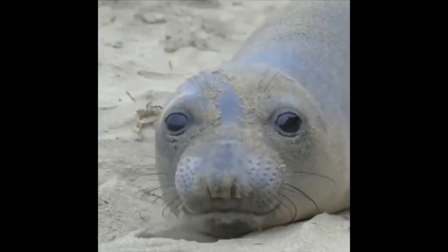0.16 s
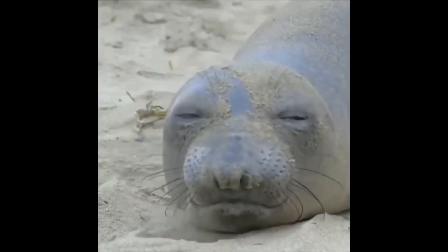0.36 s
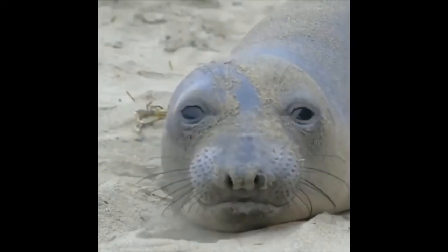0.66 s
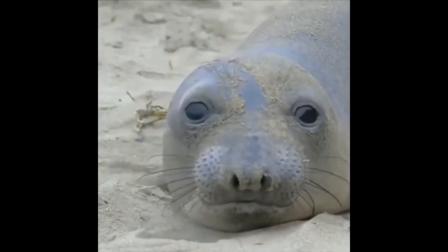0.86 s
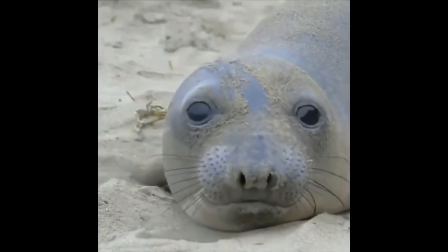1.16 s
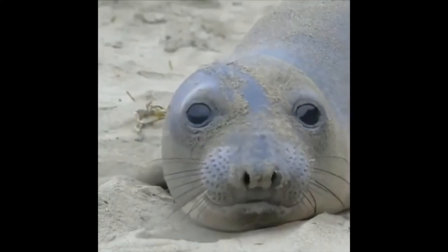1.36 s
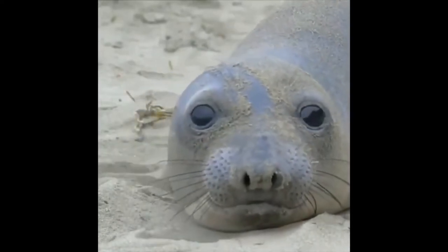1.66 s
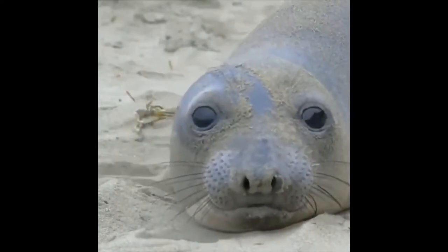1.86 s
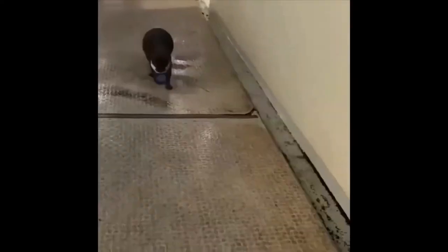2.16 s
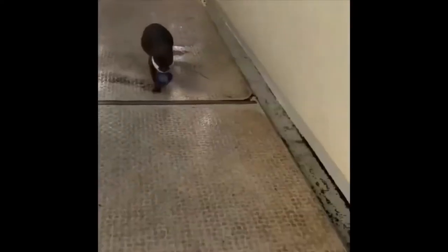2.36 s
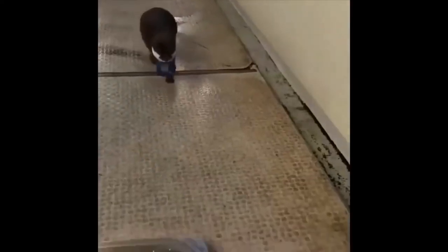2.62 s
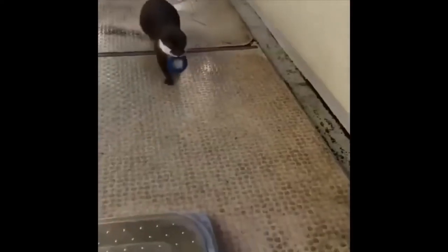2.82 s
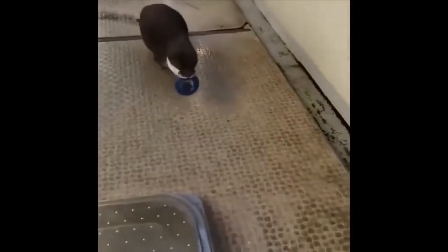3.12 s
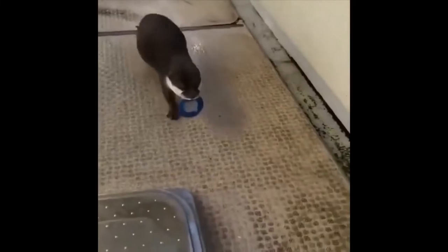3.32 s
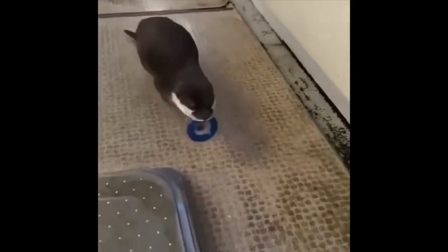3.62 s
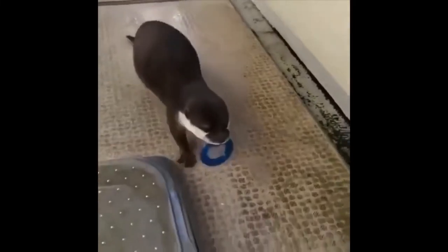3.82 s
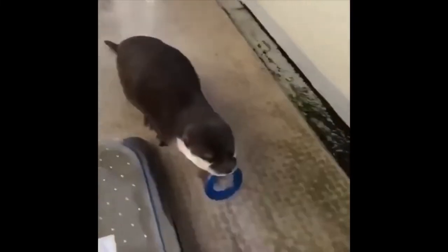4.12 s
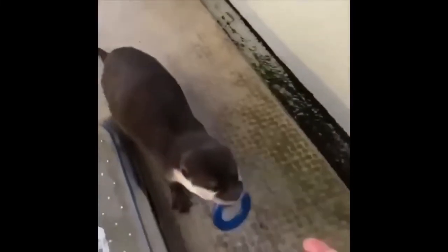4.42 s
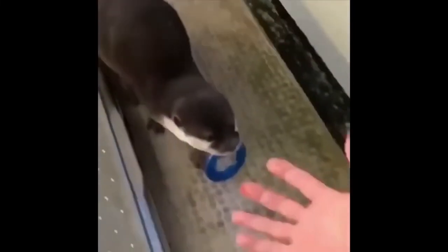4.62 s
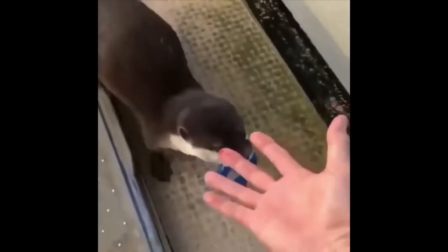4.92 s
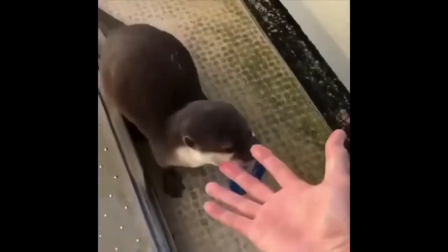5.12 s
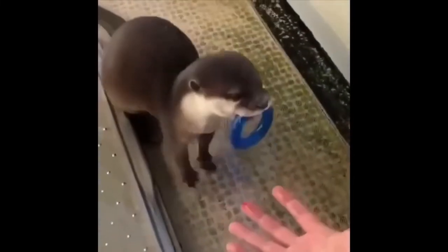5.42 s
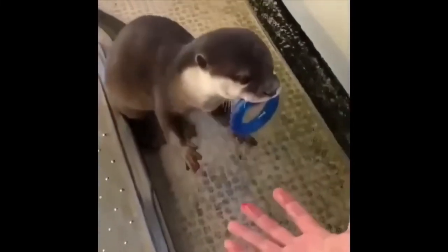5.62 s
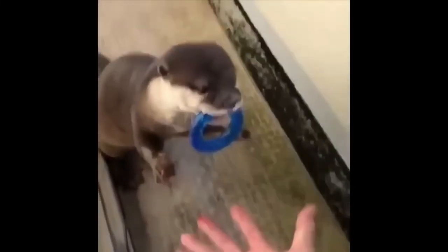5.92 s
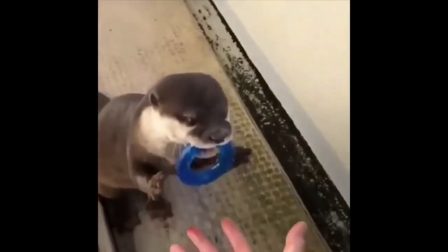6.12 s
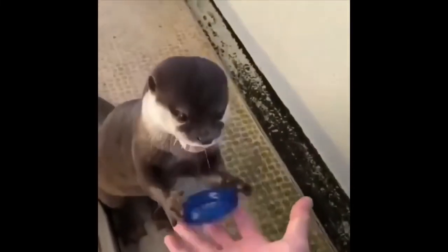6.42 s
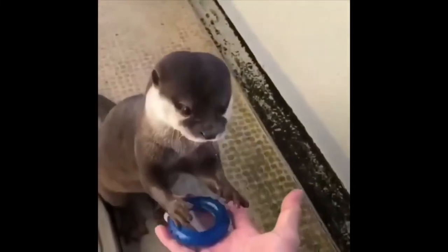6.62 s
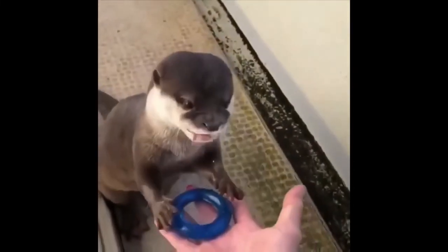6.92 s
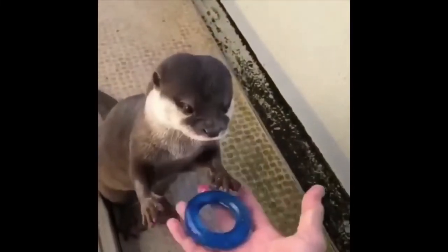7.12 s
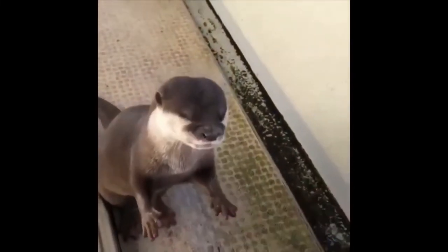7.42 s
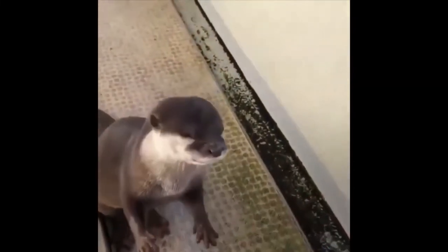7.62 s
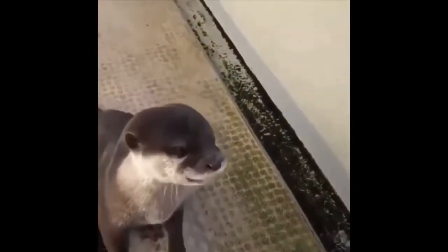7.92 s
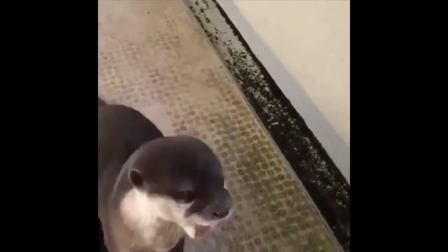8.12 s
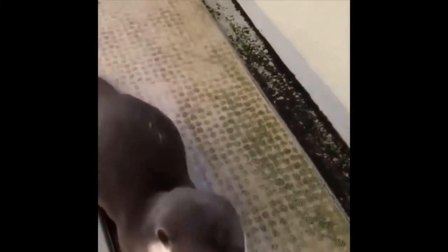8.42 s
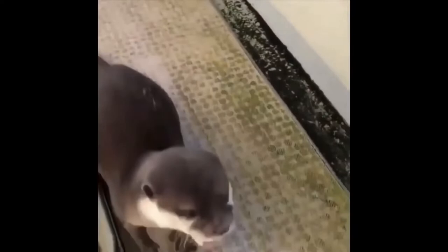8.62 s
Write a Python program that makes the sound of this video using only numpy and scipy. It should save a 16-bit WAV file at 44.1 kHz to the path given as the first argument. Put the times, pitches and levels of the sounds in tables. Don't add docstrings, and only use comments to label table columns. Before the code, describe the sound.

From 0 to 2.15 s, soft surf hisses and washes on a beach. A seal pup gives small nasal puffs and low snort thumps around 0.4-0.8 s and one at 1.57 s; distant seals grunt faintly from 0.6 to 2 s. A quick dropout leads to silence until 2.35 s, when a hard-walled pen cuts in with low microphone buffeting and an otter's falling whistle. Chirps at 2.86 and 2.99 s lead into another sinking whistle to 3.5 s; chirps at 3.85 and 3.97 s run into a longer one until 4.85 s. Claws and a rubber ring tick on the floor. A catch and chirp near 5.4 s start the longest squeal, to 6.1 s. From 6.5 to 7.5 s a wavering whistle leaps, then sinks hoarsely in steps. Afterwards only shuffles, ticks, faint hum and room hiss remain to 9 s.

```python
import sys
import numpy as np
from scipy import signal
from scipy.fft import rfft, irfft
from scipy.io import wavfile
from scipy.ndimage import uniform_filter1d, minimum_filter1d

SR = 44100
rng = np.random.default_rng(int(sys.argv[2]) if len(sys.argv) > 2 else 0)


def store_wav(level_fs):
    pcm = np.round(np.clip(np.atleast_2d(level_fs), -1, 1) * 32767)
    wavfile.write(sys.argv[1], SR, pcm.T.astype(np.int16))


def volts(x):
    e = np.asarray(x, float) / 20
    return 10 ** e


N = 386316


def in_time(rows):
    s, *columns = np.transpose(rows)
    return [np.interp(np.arange(N) / SR, s, c) for c in columns]


def at_hz(points, hz):
    table_hz, db = np.array(points).T
    return np.interp(np.log(hz), np.log(table_hz), db)


def joined(tables):
    return sorted(row for rows in tables for row in rows)


def rms_one(x):
    return x / np.sqrt(np.mean(x ** 2) + 1e-20)


def white_noise():
    return rng.standard_normal(N)


def drift(rate):
    r = np.exp(-80 * np.pi * rate / SR)
    slow = signal.lfilter([1], [1, -2 * r, r * r], rng.standard_normal(N // 40 + 2002))[2000:]
    return np.interp(np.arange(N) / 40, np.arange(len(slow)), rms_one(slow))


def plateau(s, rise_s, hold_s, fall_s):
    return np.interp(np.arange(N) / SR, np.cumsum([s, rise_s, hold_s, fall_s]), [0, 1, 1, 0])


def hump(ratio, width_oct):
    return np.exp(-.5 * (np.log2(ratio) / width_oct) ** 2)


def band(x, low_hz, high_hz, order=2):
    return signal.sosfilt(signal.butter(order, [low_hz, high_hz], "band", fs=SR, output="sos"), x)


def coloured(spectrum, patchy_db):
    hz = np.maximum(np.fft.rfftfreq(N, 1 / SR), 1)
    shaped = rfft(white_noise()) * volts(at_hz(spectrum, hz))
    power = np.abs(shaped) ** 2
    together = drift(7.2)
    out = np.zeros(N)
    for centre in 30 * 2. ** np.arange(10):
        share = np.cos(np.pi / 2 * np.clip(np.log2(hz / centre), -1, 1)) ** 2
        if share @ power > 1e-5 * np.sum(power):
            flicker_db = patchy_db * (0.12 * together + drift(10.7))
            out += irfft(shaped * share, N) * volts(flicker_db)
    return rms_one(out)


def sounding(tables, fade_s):
    gate, t = np.zeros(N), np.arange(N) / SR
    for rows in tables:
        opening = np.clip((t - rows[0][0]) / fade_s + .5, 0, 1)
        closing = np.clip((rows[-1][0] - t) / (4 * fade_s) + .5, 0, 1)
        gate += opening * closing
    return in_time(joined(tables)), np.minimum(gate, 1)


def knocks(events, cycles, rise):
    out = np.zeros(N)
    for (s, peak_db, hz, *_), sign in zip(events, rng.choice([-1, 1], len(events))):
        turns = np.arange(int(3 * cycles / hz * SR)) / SR * hz
        shape = (turns / cycles) ** rise * np.exp(-3 * turns / cycles)
        swing = np.sin(2 * np.pi * turns) * shape
        at = round(s * SR)
        out[at:at + len(turns)] += (sign * volts(peak_db) * swing / np.abs(swing).max())[:N - at]
    return out


# (time [s], hiss level [dB], low wash level over the hiss [dB])
SURF = [
    (0.0, -35.5, -2.5),
    (0.36, -37, -4.5),
    (.66, -36, -9),
    (1.0, -39, -2.5),
    (1.5, -37, -9.5),
    (1.9, -37.5, 0.5),
    (2.05, -37, -4),
    (2.15, -37.5, -3.5),
]
# (frequency [Hz], level per Hz [dB])
SURF_TONE = [(18, -69), (30, -11.5), (148, 2), (255, 1.5), (708, -5.5), (1220, -4), (1960, -5),
             (3300, -9.5), (4930, -19), (8320, -31.5), (11500, -37), (15000, -88)]


def surf():
    hiss_db, wash_db = in_time(SURF)
    hiss = coloured(SURF_TONE, patchy_db=1.0)
    low = signal.sosfilt(signal.butter(1, 350, fs=SR, output="sos"), hiss)
    return volts(hiss_db - 1.63) * (hiss + (volts(wash_db + 2.0) - 1) * low)


# (time [s], length [s], start pitch [Hz], end pitch [Hz], level [dB])
GRUNTS = [
    (0.618, 0.068, 233, 265, -55),
    (0.959, 0.13, 255, 294, -43.5),
    (1.147, 0.24, 182.4, 168.5, -43.5),
    (1.594, 0.1086, 142.2, 140.5, -41.5),
    (1.802, .22, 176, 202.8, -45.5),
]


def far_grunts():
    shapes = []
    for s, length, hz, end_hz, db in GRUNTS:
        shapes.append([(s, hz, db - 7), (s + 0.022, hz, db), (s + length, end_hz, db - 6)])
    (hz, grunt_db), gate = sounding(shapes, fade_s=.02)
    tone = np.sin(2 * np.pi * np.cumsum(hz) / SR)
    return np.sqrt(2) * gate * volts(grunt_db + 1.1 * drift(20)) * tone


# (time [s], hold [s], level [dB])
PUFFS = [
    (0.406, 0.14, -55),
    (0.577, 0.11, -51.5),
]
# (time [s], peak level [dB], pitch [Hz])
SNORTS = [
    (0.41, -39, 247),
    (0.63, -24, 180),
    (0.667, -19, 217),
    (0.687, -19, 222),
    (0.786, -28, 190),
    (1.566, -19.5, 316),
]


def seal_pup():
    blowing = sum(volts(db) * plateau(s, 0.02, hold, 0.02) for s, hold, db in PUFFS)
    puff = blowing * rms_one(band(white_noise(), 4200, 7300))
    return puff + volts(-9.0) * knocks(SNORTS, cycles=2.6, rise=0.19)


def beach():
    mix = surf() + far_grunts() + seal_pup()
    return signal.sosfilt(signal.cheby2(12, 50, 11900, fs=SR, output="sos"), mix)


def pump():
    hz = 118 * (1 + 0.0243 * drift(8.24))
    return volts(-53 + 2.2 * drift(1.0)) * np.sin(2 * np.pi * np.cumsum(hz) / SR)


# (frequency [Hz], level per Hz [dB])
RUMBLE = [(15, -55), (25, -13), (54, -3.5), (113, -3), (190, -10.5), (281, -14), (330, -23), (430, -20.5),
          (730, -120)]


def rumble():
    usual_db, buffet_db = -48.5, -38.5
    buffet = plateau(2.03, 0.34, 0.27, 0.17)
    return volts(usual_db + (buffet_db - usual_db) * buffet) * coloured(RUMBLE, patchy_db=3.0)


# (time [s], peak level [dB], pitch [Hz])
GUSTS = [(2.352, -20.5, 132), (2.362, -16.5, 270), (2.387, -20.5, 200), (2.423, -22, 222),
         (2.4502, -13, 340), (2.4546, -18.5, 200), (2.470, -19.5, 134), (2.519, -25.5, 156),
         (2.556, -21.5, 125), (2.594, -17, 280), (2.607, -23.5, 95), (2.655, -26.5, 95),
         (2.714, -30.5, 169), (2.755, -35, 160), (2.797, -25, 155), (6.305, -34.5, 144), (7.637, -36, 238),
         (7.681, -35, 119)]


def gusts():
    rebounds = [(s + 0.01025, db - 7, max(0.48 * hz, 70)) for s, db, hz in GUSTS]
    swings = volts(2.0) * band(knocks(list(GUSTS) + rebounds, cycles=1.74, rise=0.52), 24, 740)
    swirl = uniform_filter1d(np.abs(swings), int(0.0065 * SR)) * rms_one(band(white_noise(), 84, 596))
    return swings + volts(-11.5) * swirl


def patter(stir_db):
    per_s = 20 * volts(2 * stir_db)
    born = rng.random(N) < per_s / SR
    clicks = born * volts(-50 + 4.1 * np.minimum(rng.exponential(1, N), 3)) + 1e-18
    dealt = rng.integers(0, 5, N)
    out = np.zeros(N)
    for k, hz in enumerate(np.geomspace(2400, 7500, 5)):
        out += 4 * band(clicks * (dealt == k), hz, 1.77 * hz, order=1)
    return out


# (middle time [s], length [s], level over the usual rustle [dB])
SHUFFLES = [
    (2.804, 0.081, 14),
    (3.72, 0.28, 11.5),
    (5.14, 0.25, 9),
    (6.287, 0.25, 10),
    (7.552, 0.58, 7.5),
    (8.216, 0.3, 9.5),
    (8.36, 0.081, 6),
    (8.415, 0.47, 8.5),
]
# (frequency [Hz], level per Hz [dB])
RUSTLE = [(1940, -1), (3300, -4), (4550, -3.5), (5450, -5), (5690, -7), (7110, -9.5), (13000, -14),
          (14000, -18)]


def floor_rustle():
    stir_db = sum(db * plateau(s - length / 2, length / 2, 0, length / 2) for s, length, db in SHUFFLES)
    return volts(-60 + stir_db) * coloured(RUSTLE, patchy_db=4.5) + patter(stir_db)


# (frequency [Hz], level per Hz [dB])
AIR = [(160, -23), (280, 0), (506, -5.5), (625, -6), (924, -7), (1220, -9), (1720, -12), (1880, -5.5),
       (3500, -21), (4550, -34), (7700, -120)]


def pen_air(calling):
    air = volts(-53) * coloured(AIR, patchy_db=2.5)
    duck = volts(-1.5 * uniform_filter1d(calling, int(0.028 * SR)))
    return pump() + rumble() + duck * (air + floor_rustle()) + gusts()


# (time [s], peak level [dB], pitch [Hz])
FAR_SQUEAK = [
    (3.125, -40, 870),
    (3.645, -41, 1850),
    (5.2, -46, 2168),
    (5.25, -53, 2110),
    (5.275, -51, 3100),
]


def far_squeaks():
    return knocks(FAR_SQUEAK, cycles=17.0, rise=2.5)


# (time [s], peak level [dB], main ring [Hz], bright part over peak [dB])
TICKS = [(2.362, -31, 2210, -18.5), (2.451, -34, 1000, -29), (2.785, -24.5, 2310, -35),
         (2.7953, -22.5, 2144, -30.5), (2.8809, -23, 2060, -36), (3.0002, -21.5, 2340, -29.5),
         (3.169, -34.5, 2148, -13), (3.492, -48, 2280, -7), (3.611, -66, 3570, 1), (3.706, -24, 2310, -26),
         (3.724, -35.5, 1855, -23), (3.767, -53.5, 2355, -5), (3.791, -59, 2426, -4),
         (3.926, -43, 2723, -18), (4.519, -27, 1946, -19), (4.6339, -28.5, 932, -14.5),
         (4.737, -22.5, 1727, -17.5), (4.86, -40.5, 4704, -20), (4.8868, -37, 2534, -23),
         (5.0462, -26, 3036, -18), (5.049, -25, 8300, -36), (5.049, -32, 9200, -27),
         (5.0983, -33, 2245, -19), (5.262, -57, 3060, -6), (5.321, -54, 4810, -31),
         (5.6535, -47, 3010, -23), (6.093, -55, 2210, -3), (6.2655, -37.5, 2730, -16),
         (6.2665, -37, 4495, -20), (7.359, -39.5, 1603, -8.5)]
# (time [s], peak level [dB], main ring [Hz], bright part over peak [dB])
LATE_TICKS = [ (7.4953, -31, 2053, -17.5), (7.548, -56, 4550, -12), (7.5777, -38, 5560, -24),
              (7.6095, -63, 3520, 2), (7.657, -48, 4730, -20), (7.67, -42, 4770, -29),
              (7.687, -37.5, 6350, -24), (7.7, -38.5, 4350, -23), (7.7538, -43, 1940, -13.5),
              (7.806, -39.5, 3110, -24), (7.915, -58, 1860, 2), (7.948, -66, 2140, -1),
              (8.0634, -62, 2370, 2.5), (8.2242, -23, 2054, -16.5), (8.226, -40, 5170, -40),
              (8.2257, -29, 1580, -35), (8.227, -49, 6070, -27), (8.34, -37, 2930, -32),
              (8.352, -44, 4440, -28), (8.4743, -41, 2490, -16), (8.52, -45, 3350, -23),
              (8.6, -52, 6300, -25), (8.6288, -44.5, 2300, -29), (8.7, -51, 5100, -30),
              (8.7544, -43, 3130, -8.5)]


def ticks():
    contacts = list(TICKS) + list(LATE_TICKS)
    bodies = [(s, db - 8, 0.58 * hz) for s, db, hz, _ in contacts]
    out = volts(-1.5) * knocks(contacts, cycles=9.0, rise=1.1) + knocks(bodies, cycles=2.9, rise=0.63)
    t = np.arange(SR // 20) / SR
    for s, peak_db, hz, bright_db in contacts:
        white = rng.standard_normal(len(t))
        mode_hz = min(2.65 * hz, 9500)
        crack = .7 * band(white, 1000, 14500, order=1) + 2.5 * band(white, .82 * mode_hz, 1.2 * mode_hz)
        crack *= np.exp(-t / 0.0055) * np.clip(t / 0.0011, 0, 1)
        at = round(s * SR)
        out[at:at + len(t)] += (volts(peak_db + bright_db + 16.0) * crack / np.abs(crack).max())[:N - at]
    return out


# (time [s], hold [s], level [dB])
RASPS = [
    (2.803, 0.11, -54.5),
    (2.885, 0.065, -49),
    (2.944, 0.15, -48.5),
    (3.867, 0.11, -46.5),
    (3.996, 0.1, -45),
    (5.378, 0.025, -54),
]


def rasps():
    blowing = sum(volts(db) * plateau(s, 0.0061, hold, 0.0061) for s, hold, db in RASPS)
    return blowing * volts(5.1 * drift(54)) * rms_one(band(white_noise(), 990, 2650))


# (top time [s], climb [s], top pitch [Hz], landing pitch [Hz], push [dB])
CHIRPS = [
    (2.864, 0.029, 2250, 874, -34.5),
    (2.987, 0.043, 2100, 1250, -33),
    (3.849, 0.035, 2280, 933, -25.5),
    (3.971, 0.032, 1645, 1237, -39.5),
    (5.44, 0.03, 1972, 1230, -28),
]
# (start pitch [Hz], drop [s])
CHIRP_GLIDES = [
    (1778, .044),
    (1197, .04),
    (1448, .038),
    (1185, .031),
    (1217, 0.036),
]
CHIRP_END_DB = [
    -22,
    -3,
    -33,
    -1.5,
    -19,
]
CHIRP_OPENING_DB = [
    -8,
    -9.5,
    -19,
    -3.5,
    -12,
]


def chirps():
    pitch, effort = [], []
    start_db = -21.5
    for chirp, glide, end_db, open_db in zip(CHIRPS, CHIRP_GLIDES, CHIRP_END_DB, CHIRP_OPENING_DB):
        s, climb, top_hz, landing_hz, db = chirp
        start_hz, drop = glide
        fall_hz = top_hz - landing_hz
        end = s + drop + 0.011
        pitch.append([
            (s - climb, start_hz),
            (s - climb / 2, top_hz - .2 * (top_hz - start_hz)),
            (s, top_hz),
            (s + drop / 3, top_hz - .11 * fall_hz),
            (s + 2 * drop / 3, top_hz - .72 * fall_hz),
            (s + drop, landing_hz),
            (end, landing_hz)])
        effort += [
            (s - climb, db + start_db, open_db - start_db / 2),
            (s - climb / 3, db, open_db),
            (s + drop / 4, db, open_db),
            (end, db + end_db, open_db - end_db / 2)]
    return pitch, effort


# (time [s], pitch [Hz])
WHISTLES = [
    [(2.347, 1150), (2.393, 1145), (2.441, 1104), (2.459, 995), (2.521, 973.8), (2.529, 912), (2.561, 942),
     (2.593, 872.6), (2.608, 835)],
    [(3.04, 1216), (3.06, 1234), (3.21, 1192), (3.288, 1109), (3.348, 1138), (3.396, 997), (3.452, 995),
     (3.478, 856), (3.495, 822)],
    [(4.02, 1196), (4.048, 1262), (4.106, 1192), (4.13, 1232), (4.142, 1228), (4.244, 1119), (4.348, 1090),
     (4.406, 1037), (4.5, 984)],
    [(4.501, 947), (4.521, 965), (4.585, 949), (4.615, 986), (4.653, 924.5), (4.729, 933.5), (4.807, 786.5),
     (4.837, 752), (4.85, 800)],
]
# (time [s], pitch [Hz])
WHISTLES_NEAR = [
    [(5.487, 1234), (5.507, 1474), (5.519, 1572), (5.54, 1370), (5.59, 1272), (5.64, 1254), (5.662, 1276),
     (5.676, 1233), (5.716, 1276)],
    [(5.717, 1243), (5.748, 1290), (5.78, 1250), (5.82, 1248), (5.9, 1201), (6.0, 1197), (6.047, 1149),
     (6.071, 907), (6.083, 902)],
    [(6.515, 963), (6.551, 1166), (6.561, 1238), (6.577, 1006), (6.625, 1033), (6.667, 896), (6.743, 957),
     (6.771, 918), (6.8, 956)],
]
# (time [s], pitch [Hz])
LAST_RISE = [
    [(6.801, 964), (6.813, 1006), (6.827, 1184), (6.835, 1199), (6.845, 1184), (6.895, 1240), (6.917, 1306),
     (6.95, 1291)],
    [(6.951, 1247), (6.979, 1214), (7.039, 1189), (7.057, 1148), (7.091, 1170), (7.105, 1128),
     (7.115, 1085)],
]
# (time [s], pitch [Hz])
LAST_FALL = [
    [(7.116, 1025), (7.128, 1011), (7.184, 985), (7.22, 913), (7.236, 867), (7.28, 873), (7.3, 853)],
    [(7.301, 830), (7.341, 861), (7.401, 774.5), (7.437, 699), (7.469, 667), (7.49, 663)],
]
# (time [s], pitch [Hz], push [dB], mouth opening [dB])
CATCH = [
    (5.384, 789, -39, -9),
    (5.394, 826.5, -38, -10),
    (5.404, 990, -20.5, -16),
    (5.41, 1124, -34, -3.5),
]


def pitch_path(chirp_pitch):
    calls = list(WHISTLES) + list(WHISTLES_NEAR) + list(LAST_RISE) + list(LAST_FALL)
    catch = [(s, hz) for s, hz, *_ in CATCH]
    (hz,), gate = sounding(calls + chirp_pitch + [catch], fade_s=0.0046)
    return uniform_filter1d(hz, int(.006 * SR)), gate


CHIRP_STRAIN = [
    .35,
    .25,
    .12,
    .4,
    .05,
]
# (time [s], hold [s], strain [0-1])
HOARSE = [
    (2.98, .04, .6),
    (3.97, .11, .9),
    (2.56, .03, .4),
    (3.42, .07, .6),
    (4.81, .03, .4),
    (6.5, .05, .6),
    (7.37, .1, .45),
]


def fold_strain(hz, chirp_pitch):
    glide = np.abs(np.gradient(np.log(hz))) * SR
    strain = np.clip(uniform_filter1d(glide, int(.03 * SR)) / 20, 0, 1)
    for rows, least in zip(chirp_pitch, CHIRP_STRAIN):
        start, end = rows[0][0], rows[-1][0]
        strain = np.maximum(strain, least * plateau(start, 0.0026, end - start, 0.0066))
    hoarse = sum(share * plateau(s, 0.025, hold, 0.03) for s, hold, share in HOARSE)
    return np.clip(np.maximum(strain, hoarse), 0, 1)


# (time [s], push [dB], mouth opening over push [dB])
EFFORT = [
    [(2.347, -35.5, -11), (2.361, -41, -5), (2.455, -39, -8.5), (2.491, -57, 12), (2.511, -36.5, -10.5),
     (2.579, -40, -9.5), (2.608, -74, 3)],
    [(3.04, -44, 0), (3.068, -31, -17), (3.135, -28.5, -14), (3.15, -32, -11), (3.208, -30, -14),
     (3.288, -38, -7), (3.3, -33, -16), (3.452, -40, -3), (3.509, -35, -18)],
    [(4.02, -34, -9), (4.042, -42, -0.5), (4.088, -32, -12), (4.264, -25.5, -12.5), (4.322, -25.5, -16),
     (4.448, -24.5, -14), (4.5, -29, -9)],
    [(4.501, -31, -6.5), (4.585, -30.5, -10.5), (4.609, -28.5, -12.5), (4.729, -37, 8), (4.761, -28.5, -5),
     (4.851, -47, 2), (4.859, -56, 11)],
]
# (time [s], push [dB], mouth opening over push [dB])
LONG_EFFORT = [
    [(5.487, -33, -23), (5.525, -54.5, 20.5), (5.537, -44.5, 3), (5.593, -29.5, -11.5),
     (5.643, -29.5, -6.5), (5.657, -31, -7), (5.677, -33, -8.5), (5.715, -40.5, 5), (5.75, -30, -6)],
    [(5.751, -32, -4), (5.763, -29, -8.5), (5.775, -31, -10), (5.867, -25.5, -14.5), (5.879, -27, -16),
     (6.011, -24.5, -22), (6.061, -36.5, -13), (6.083, -52, 2)],
]
# (time [s], push [dB], mouth opening over push [dB])
EFFORT_NEAR = [
    [(6.515, -36, -13), (6.519, -29.5, -14.5), (6.537, -31, -18), (6.577, -43.5, 3), (6.607, -37.5, 3.5),
     (6.647, -45, -6.5), (6.785, -43.5, -1), (6.8, -42, -2)],
    [(6.801, -54, 10), (6.825, -14, -26), (6.839, -36, -14), (6.851, -21, -23.5), (6.865, -38.5, 0),
     (7.009, -35, -3.5), (7.061, -28.5, -14.5), (7.115, -30, -9)],
    [(7.116, -30.5, -10), (7.126, -49.5, 9), (7.154, -25.5, -15), (7.176, -42.5, 8.5),
     (7.302, -24.5, -21.5), (7.394, -27.5, -15.5), (7.42, -38.5, 4), (7.505, -49, -7)],
]
# (frequency [Hz], level [dB])
CHEST = [(680, -22), (790, -32), (850, -31), (940, -38.5), (1005, -34.5), (1060, -40.5), (1120, -37.5),
         (1260, -35), (1450, -33.5), (1650, -35.5)]
# (from time [s],
# chest level over usual [dB])
CHEST_STEPS = [(2.3, 4.5), (2.45, 1.5), (2.8, -8), (2.878, 0), (2.93, -4), (3.0, -11), (3.02, -1.5), (3.3, 2),
               (3.44, -4), (3.7, 3), (3.9, 2.5), (3.995, 0), (4.3, 4.5), (4.75, 3), (4.835, -4), (5.3, 3),
               (5.55, 2.5), (5.72, 4.5), (6.4, 4), (6.8, -1), (7.1, -3.5), (7.4, -6), (7.471, -8)]


def region_efforts(hz, chirp_effort):
    catch = [(s, push, opening) for s, _, push, opening in CATCH]
    whistles = list(EFFORT) + list(LONG_EFFORT) + list(EFFORT_NEAR)
    push_db, opening_db = in_time(joined(whistles + [chirp_effort, catch]))
    chest_db = at_hz(CHEST, hz) + 0.16 * (push_db + 21)
    turns_s, facing_db = np.transpose(CHEST_STEPS)
    turn = np.searchsorted(turns_s, np.arange(N) / SR) - 1
    chest_db += facing_db[np.maximum(turn, 0)]
    return volts(np.array([chest_db, push_db - .4, push_db + opening_db - .8]))


# (frequency [Hz], level [dB])
MOUTH = [(700, 37), (1500, 28.5), (2300, 8), (2700, 15), (3050, 14), (3600, 1), (4400, -1.5), (5200, -1),
         (6600, -3), (8000, -2.5), (9300, -8.5), (10500, 1), (12000, -17.5), (14000, -10)]
# (time [s], throat ring near 3 kHz [dB], mouth ring [Hz], mouth ring [dB], treble [dB])
JAW = [(2.4, -10, 8100, 5, -4.5), (2.9, 0, 6780, 9, 0.5), (3.1, 17, 6400, 9, 9), (3.25, 6, 8160, 12, 6),
       (3.44, -27, 6000, -4, -17), (3.5, 10, 6050, 0, 6), (3.85, -11, 6900, 15, 11),
       (3.98, -4, 6500, -5, -1), (4.15, 11, 6610, 16, 4.5), (4.4, -23, 5400, 2, -8),
       (4.55, -15, 4960, -1, -6), (4.7, -15.5, 6820, 15.5, 1), (4.79, 11, 7260, 22, 13),
       (4.85, -12, 6340, 15, -10), (5.5, 0, 7210, 14.5, 7), (5.7, 25, 6100, 13, 7),
       (6.0, -17, 6200, 7.5, -1), (6.6, 2, 7200, 3, 0.5), (6.7, -16, 5500, 6, -7), (6.77, 0, 5500, 19, 0),
       (6.85, -21, 4550, 0, -4.5), (6.93, -15, 5340, 10, 3), (7.05, -8, 6000, -4, 4.5),
       (7.13, -24, 5000, 8, -1), (7.19, 5, 5640, 21, -21), (7.27, -13.5, 6280, 8, -0.5),
       (7.36, -15, 5670, 8, 2), (7.43, 8.5, 5220, 15, 4), (7.5, -21, 4730, -7, 0)]


def mouth_level(partial_hz, on):
    throat_db, ring_hz, ring_db, treble_db = np.array(in_time(JAW))[:, on]
    ring_oct = 0.12
    db = at_hz(MOUTH, partial_hz)
    db += throat_db * hump(partial_hz / 2830, 0.27)
    db += ring_db * hump(partial_hz / ring_hz, ring_oct)
    return db + treble_db * np.clip(np.log2(partial_hz / 7780) / ring_oct, 0, 1)


def otter():
    chirp_pitch, chirp_effort = chirps()
    hz, gate = pitch_path(chirp_pitch)
    strain = fold_strain(hz, chirp_pitch)
    hz = hz * (1 + .0025 * drift(45) + (.0012 + .014 * strain) * drift(250))
    effort = region_efforts(hz, chirp_effort)
    on = gate > 0
    order = np.arange(1, 21)[:, None]
    partial_hz = order * hz[on]
    level = volts(mouth_level(partial_hz, on) - 0.93 * order * strain[on]) * (partial_hz < 14300)
    swell_db = []
    for k in order.ravel():
        high = k > 2
        swell_db.append(((.4 + 1.2 * high + 2 * strain) * drift(50) + high * 4.2 * drift(13))[on])
    phase = order * 2 * np.pi * np.cumsum(hz[on]) / SR + order ** 2
    waves = level * volts(np.array(swell_db)) * np.sin(phase)
    above_nose = np.clip((partial_hz - 1500 - 200 * (order == 1)) / 200 + .5, 0, 1)
    above_mouth = np.clip((partial_hz - 2750) / 200 + .5, 0, 1)
    shares = (1 - above_nose, above_nose - above_mouth, above_mouth)
    gains = (effort[0], effort[1], effort[2] * (1 - .5 * strain))
    voice = np.zeros(N)
    for gain, share in zip(gains, shares):
        power = np.sum((share * level) ** 2, axis=0) + .05
        voice[on] += gain[on] * np.sum(share * waves, axis=0) / np.sqrt(power)
    breath = volts(-16.5 + 14 * strain) * effort[2] * rms_one(band(white_noise(), 2500, 7500, order=1))
    return gate * (np.sqrt(2) * voice + breath) + rasps(), gate


def pen_echo(x):
    t60_s, low_t60_s = 0.21, 0.59
    t = np.arange(int(.6 * SR)) / SR
    white = rng.standard_normal(len(t)) * np.clip(t / 0.00093, 0, 1)
    tail = white * volts(-60 * t / t60_s)
    tail = band(tail, 400, 3500, order=1) + .5 * band(tail, 1900, 2600)
    tail += volts(-9.5) * band(white * volts(-60 * t / low_t60_s), 560, 735)
    echo = signal.fftconvolve(x, tail / np.sqrt(np.sum(tail ** 2)))[:N]
    return volts(2.5 * drift(26)) * echo


def splice():
    fade_s, resume_s = 2.158, 2.347
    dropout = plateau(2.1, .003, .008, .001)
    t = np.arange(N) / SR
    fade_db = -38 * np.clip((t - fade_s) / .005, 0, 1) - 800 * np.clip(t - fade_s, 0, 1)
    return np.where(t < resume_s, volts(fade_db - 18 * dropout) * (t < fade_s + .04), 1)


def scene():
    voice, calling = otter()
    near = voice + ticks() + far_squeaks()
    pen = near + volts(-14.5) * pen_echo(near) + pen_air(calling)
    both = np.where(np.arange(N) < 2.3 * SR, beach(), pen)
    return np.tile(both * splice(), (2, 1))


def masked_out(x, below_db):
    hz, _, cells = signal.stft(x, SR, nperseg=1024, noverlap=512)
    band_hz = hz[:512:8, None]
    bands = (np.abs(cells[:512]) ** 2).reshape(64, 8, -1).sum(axis=1)
    bands = uniform_filter1d(bands, size=3, axis=1)
    loudest_near = -minimum_filter1d(-bands, size=5, axis=0)
    limit = volts(2 * below_db + 14 * (band_hz > 7500)) * loudest_near
    keep = (bands > limit) | (band_hz < 2300)
    cells[:512] *= np.repeat(keep, 8, axis=0)
    return signal.istft(cells, SR, nperseg=1024, noverlap=512)[1][:N]


def band_limit(x):
    return signal.sosfilt(signal.butter(12, 14480, fs=SR, output="sos"), x)


def record(dry):
    mono = signal.sosfilt(signal.butter(3, 40, "high", fs=SR, output="sos"), dry[0])
    mono = masked_out(mono, below_db=-23)
    cut = signal.sosfilt(signal.ellip(8, .5, 45, 14000, fs=SR, output="sos"), mono)
    now_and_then = np.clip(drift(6.4) - 1.3, 0, 1)
    side = volts(3) * band(np.roll(cut, 9), 8500, 14000, order=3) * now_and_then
    return band_limit(cut + side * [[1], [-1]])


dry = scene()
out = record(dry)
store_wav(out)
```